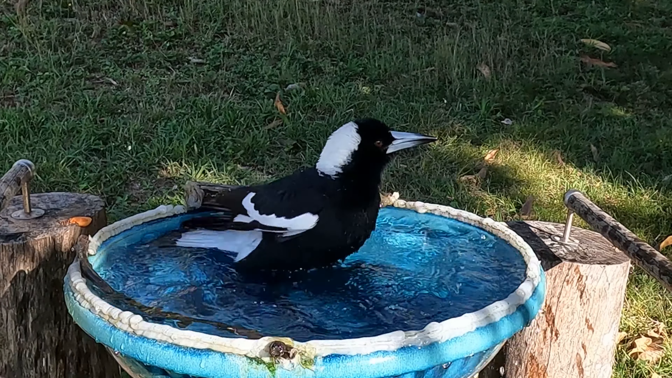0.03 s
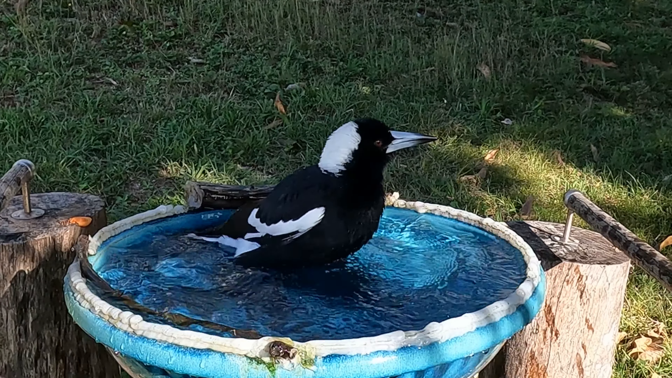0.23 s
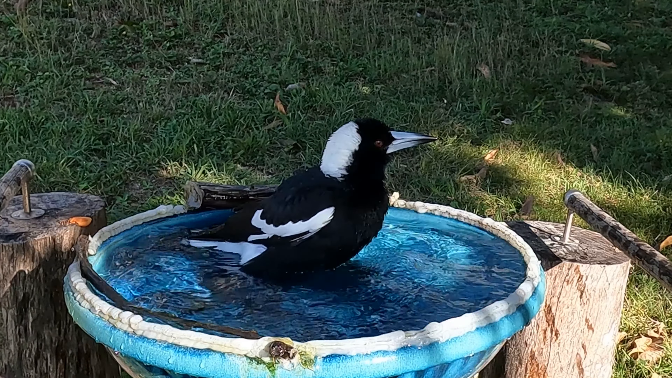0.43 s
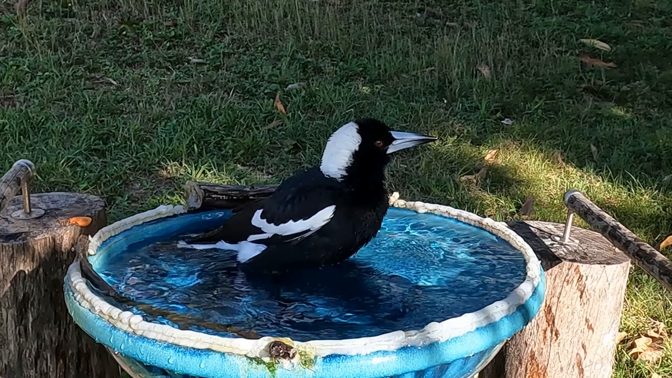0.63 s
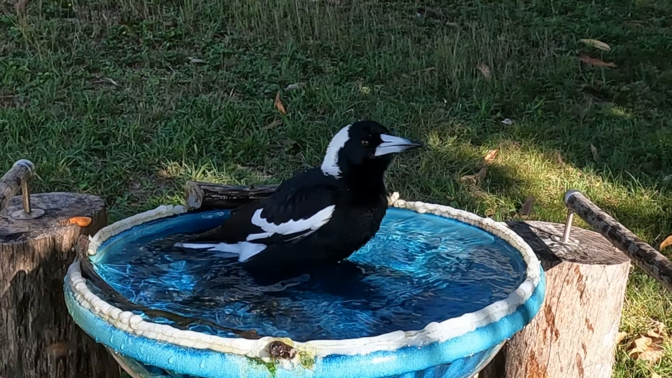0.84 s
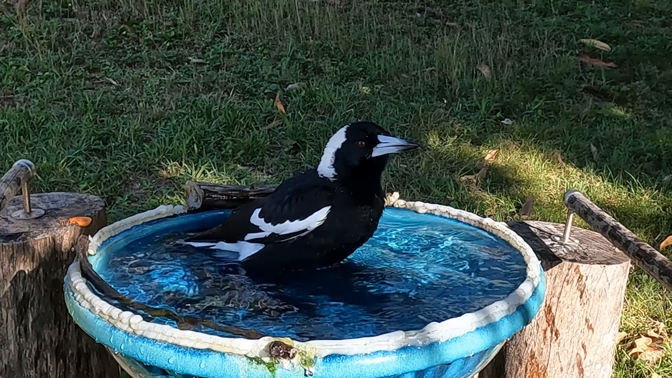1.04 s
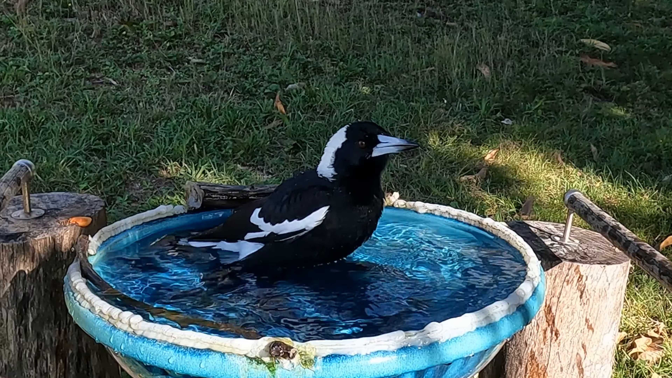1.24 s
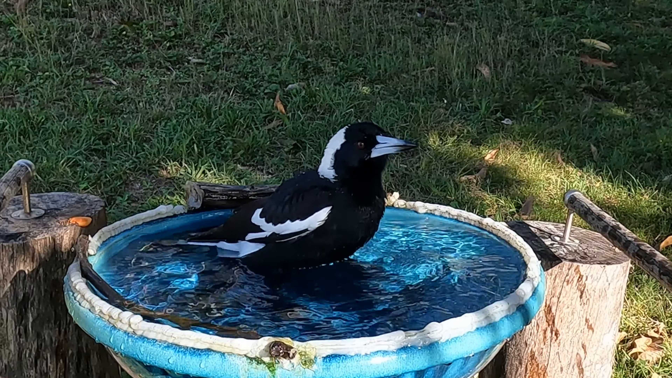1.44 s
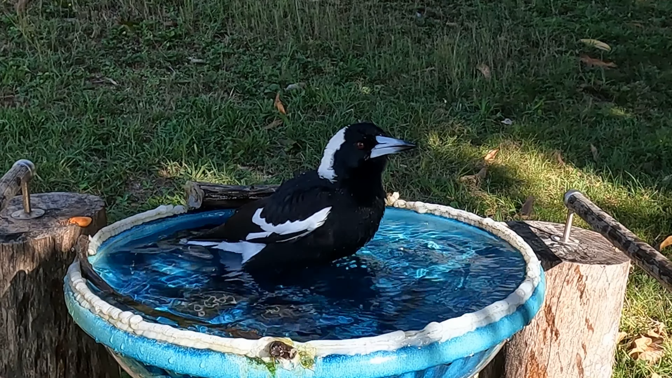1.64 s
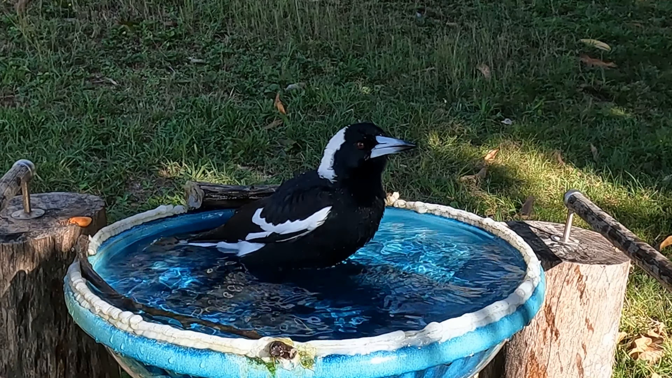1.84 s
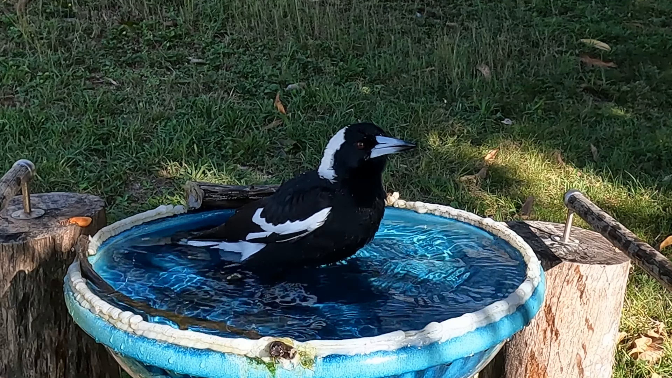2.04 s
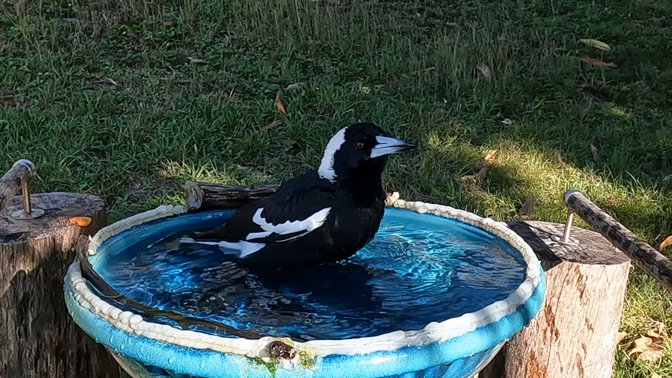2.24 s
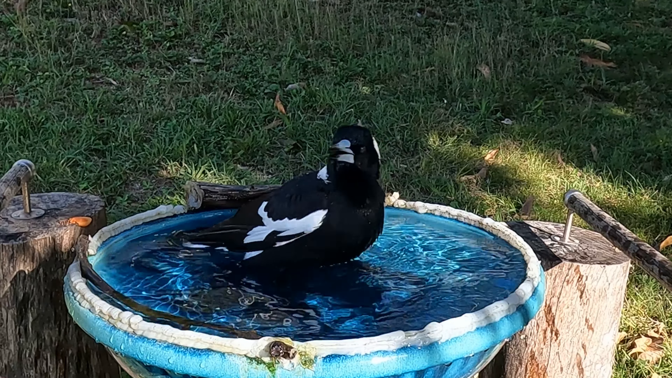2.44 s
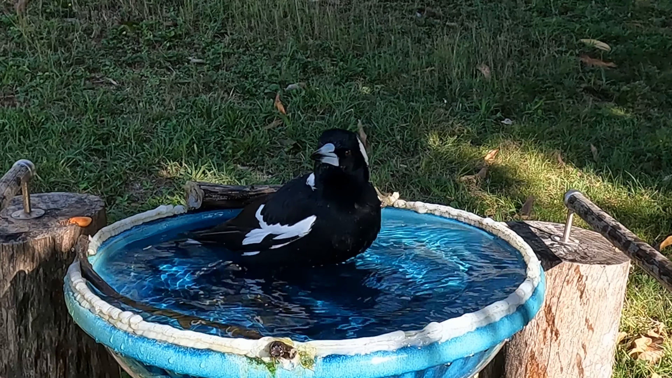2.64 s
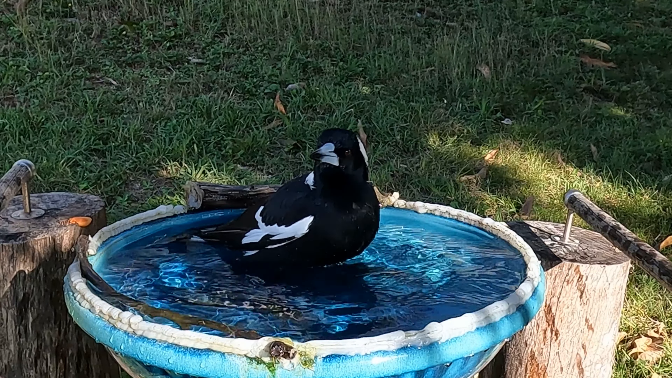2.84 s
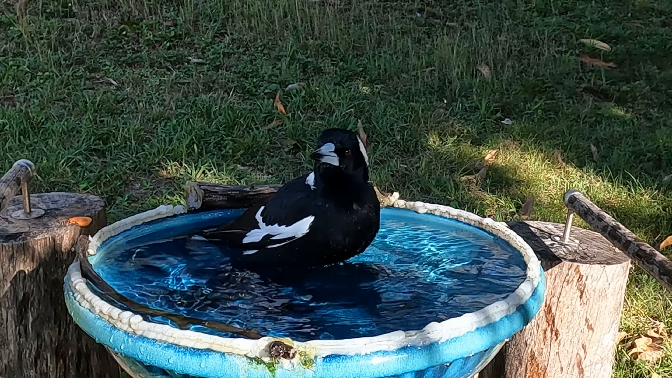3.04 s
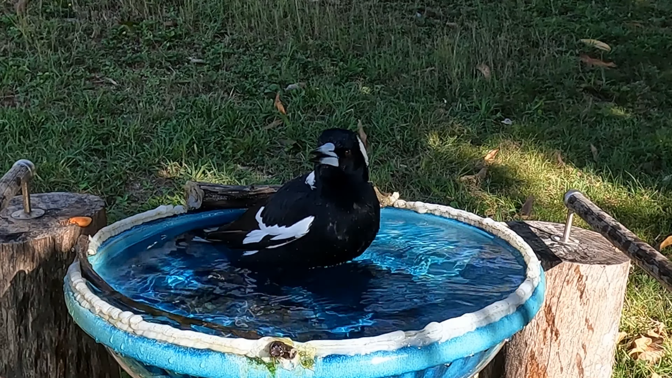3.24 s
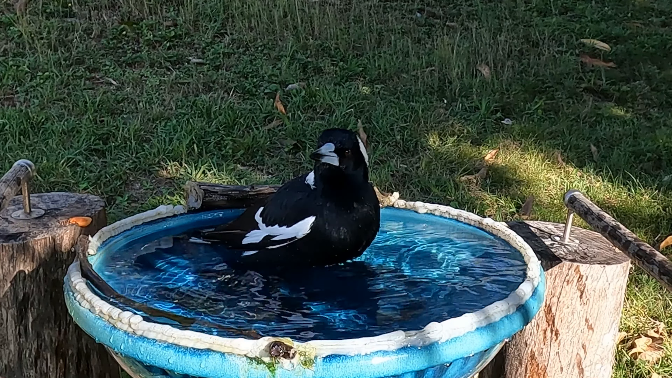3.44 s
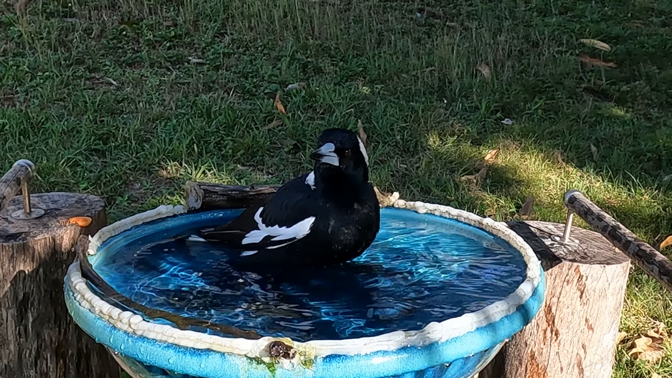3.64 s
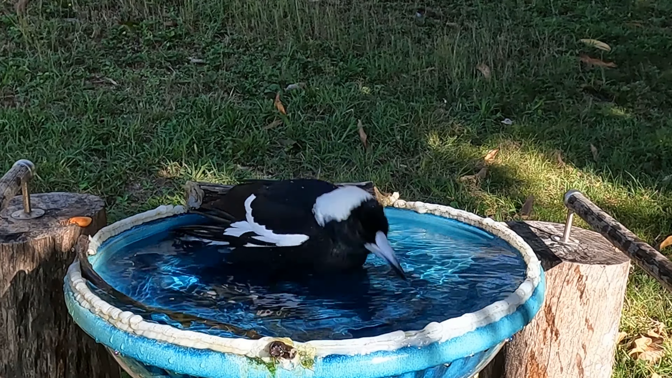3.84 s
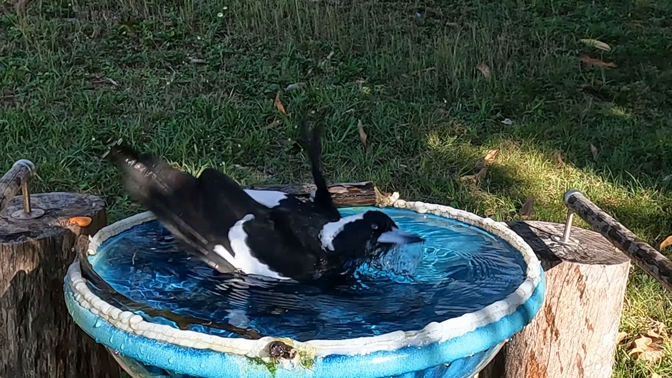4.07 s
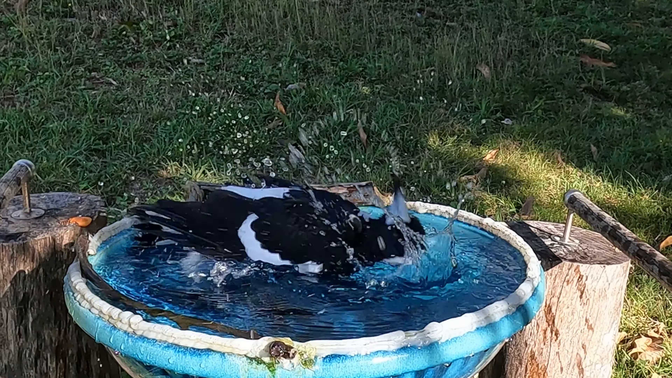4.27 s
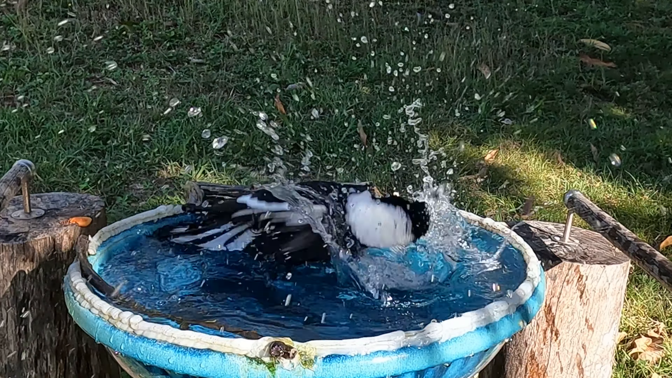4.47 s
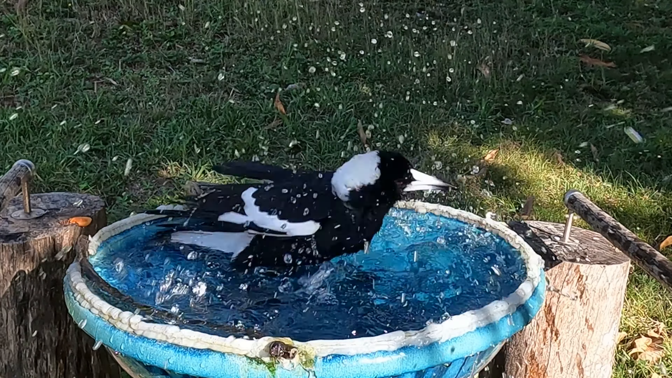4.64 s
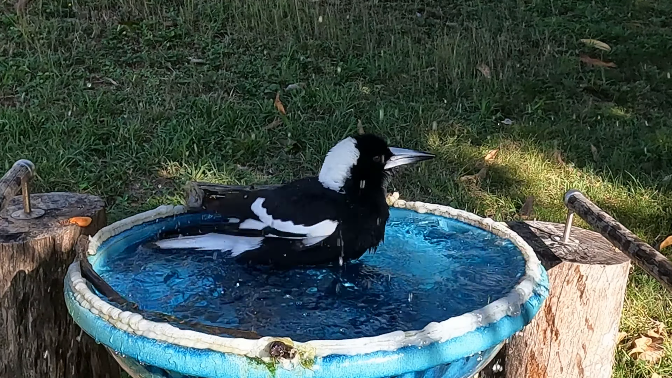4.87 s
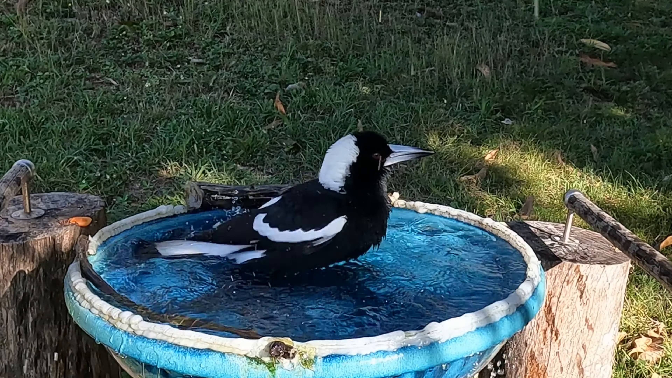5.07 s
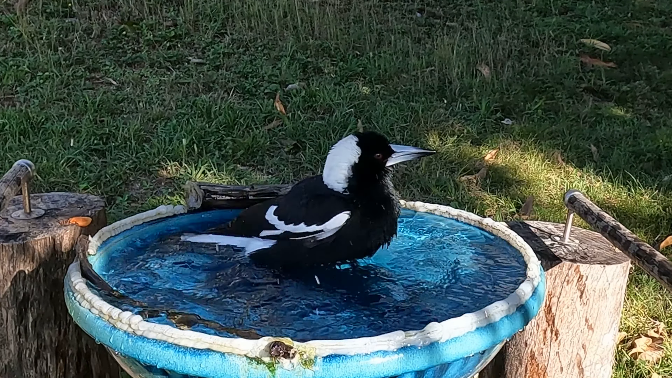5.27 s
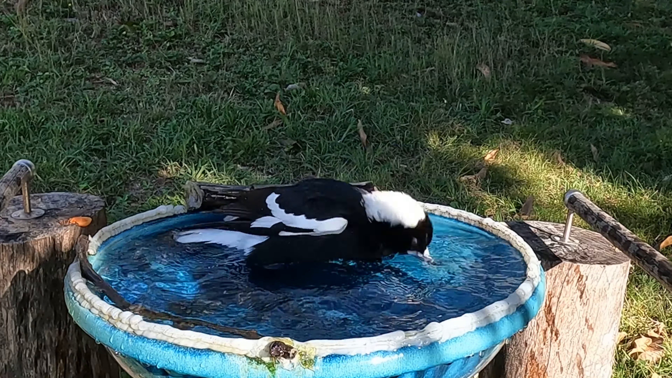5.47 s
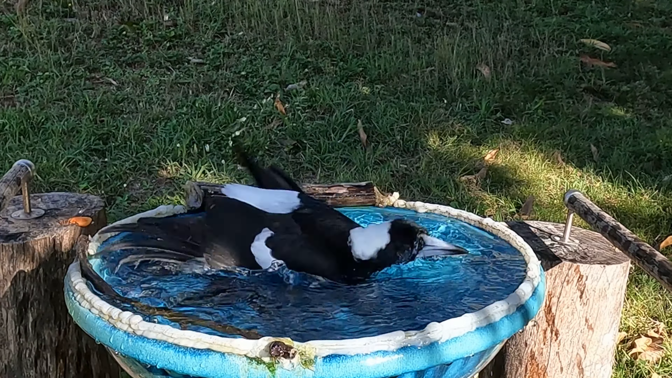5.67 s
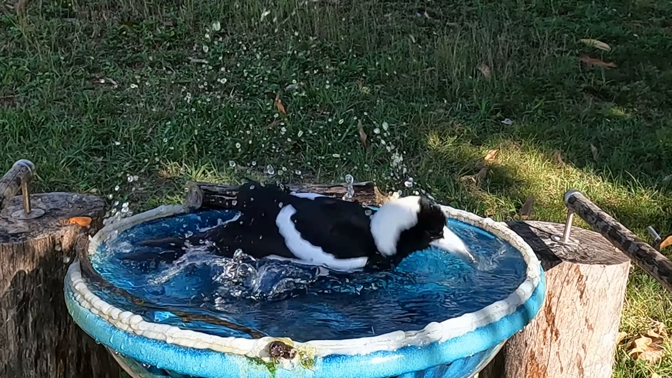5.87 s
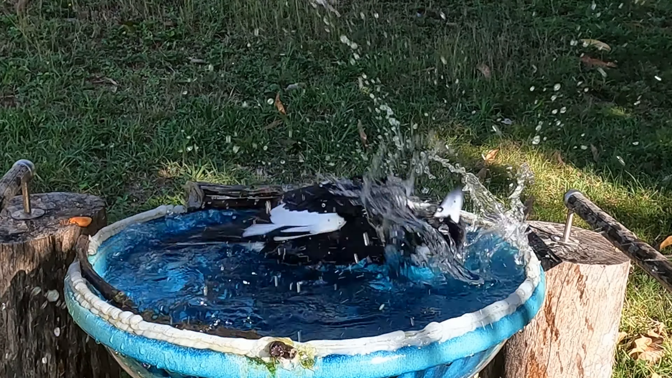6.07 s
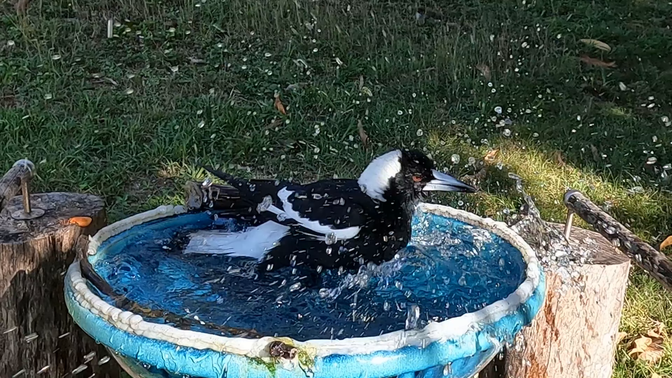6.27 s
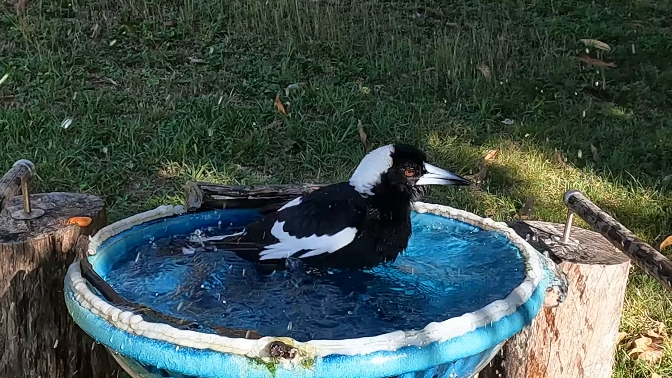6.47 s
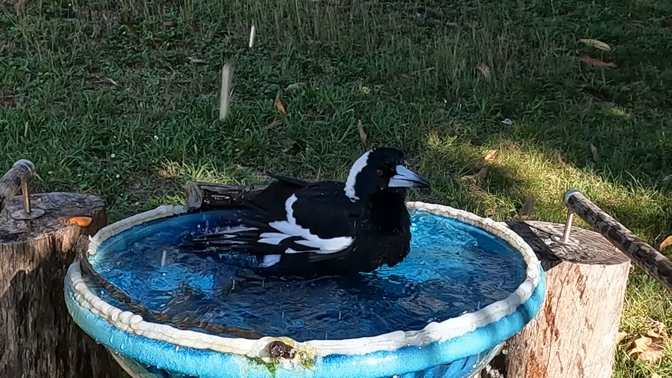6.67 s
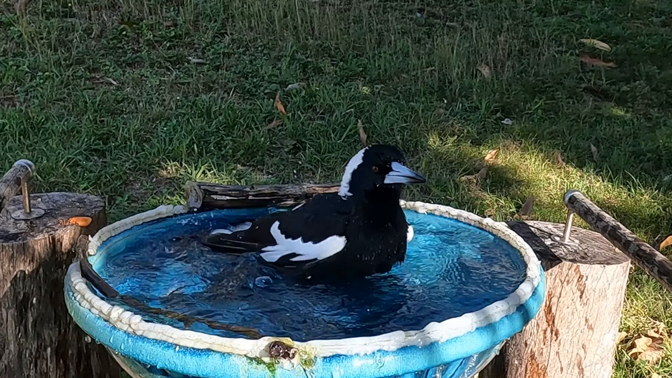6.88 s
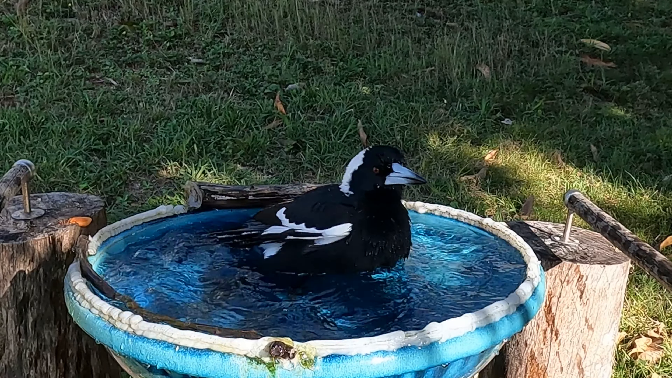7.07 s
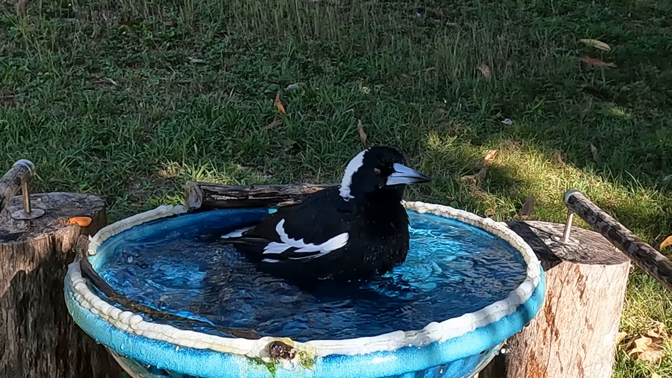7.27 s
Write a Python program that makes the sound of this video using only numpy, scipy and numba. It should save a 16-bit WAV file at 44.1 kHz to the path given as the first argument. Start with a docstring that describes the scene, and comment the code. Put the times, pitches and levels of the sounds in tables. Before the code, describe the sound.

Brief water slaps, a quiet spell of far birdsong, then two loud bouts of close splashing and bubbling as a bird bathes outdoors.

```python
"""Magpie in a garden bath

A magpie ducks and flaps in bouts in a shallow bath close to the microphone: stirred water is swarms of ringing
bubbles and spray noise, wing slaps and landing drops are noise bursts, large air pockets and the hollow ring of
the hardest slaps are gliding damped sines. Far off, among echoing fences and trees, birds whistle, coo, cheep
and trill as gliding tones with rasp and breath. A cricket throbs on a pulsed high tone, a motor hums on a
wavering low one, and shaped noise is the suburb's rumble."""
import sys
import numpy as np
from scipy import signal
from scipy.fft import rfft, irfft, next_fast_len
from scipy.io import wavfile
from scipy.ndimage import uniform_filter1d
from numba import njit

SR = 44100
rng = np.random.default_rng(int(sys.argv[2]) if len(sys.argv) > 2 else 0)


def master(y):
    """Save y as 16-bit WAV."""
    cut = np.clip(np.atleast_2d(y).T, -1, 1)
    pcm = np.round(cut * 32767)  # scale
    wavfile.write(sys.argv[1], SR, pcm.astype(np.int16))


N = 322371  # length in samples

# Far traffic, with a blur of birdsong near 2.5 kHz. Each row: frequency in Hz, relative level in dB.
SUBURB_COLOUR = [(20, -28.5), (62, -5), (125, 2), (280, -3.5), (400, -12.5), (750, -11), (1600, -19),
                 (2600, -15.5), (3150, -22), (3700, -29.5), (6800, -36), (8000, -51), (10000, -58),
                 (16000, -59)]
SUBURB_DB = -49.5  # rms before the bass swells
# Swell of the far rumble. Each row: time in seconds, gain of the bass in dB.
RUMBLE_SWELL = [(0, 1.5), (2, 0.5), (3.5, 2.5), (7.31, 2.5)]
# Distant motor. Each row: time in seconds, pitch in Hz, rms level in dB, both before the waver.
MOTOR_HUM = [(0.0, 150.2, -77), (1.12, 149.6, -61.5), (3.58, 147.9, -48.5), (6.78, 148.8, -56),
             (7.31, 149.7, -53.5)]
CRICKET_HZ, CRICKET_DB, CRICKET_FIRST_S, CRICKET_PERIOD_S = 6330, -71, .646, .1625

# Close water stirred between the wing strokes. Each row: time in seconds, level in dB.
STEADY_STIR = [(0, -48), (0.36, -52.5), (0.7, -61), (0.8, -93), (4.1, -82), (4.2, -45), (4.36, -33.5),
               (4.7, -44.5), (4.87, -54), (5.4, -52.5), (5.77, -62.5), (5.88, -38.5), (6.06, -34.5),
               (6.2, -35), (6.53, -44), (7.0, -45), (7.12, -56.5), (7.3, -54)]
# Wing strokes and showers of thrown water, each a surge of the stirring. Each row: peak time in seconds, level in dB.
STIR_SURGES = [(0.055, -37.5), (0.272, -39.5), (4.434, -34), (4.6, -32.5), (4.653, -28), (4.756, -30.5),
               (4.96, -40.5), (5.054, -36), (5.17, -41.5), (5.319, -39.5), (5.86, -35), (5.992, -29),
               (6.09, -30), (6.305, -30.5), (6.42, -38.5), (6.68, -33.5), (6.73, -38), (6.868, -35.5),
               (7.19, -51)]
SURGE_RISE_DB_S, SURGE_FALL_DB_S = 237, 207
# Wing slaps and landing drops. Each row: start in seconds, level in dB, then low body and sharp edge
# in dB against that level, the edge before a fixed trim.
SLAPS_AND_DROPS = [(0.046, -20.5, 0, -18), (0.064, -23, 2.5, -12), (0.217, -39, -17, -23),
                   (0.271, -17, -39, -16), (0.4344, -40.5, -21, -2.5), (0.491, -36.5, -13, -11),
                   (0.5454, -33.5, -14, -5.5), (0.6246, -47, -13, 6.5), (0.789, -44, 4, -12),
                   (1.35, -42.5, -11, -6), (1.6994, -47, 8, -14), (4.213, -20, -24, -28),
                   (4.235, -30.5, 2.5, -18), (4.2953, -23.5, -6, -4), (4.3475, -29, -13, -12),
                   (4.4314, -25.5, 6, 1), (4.5114, -4.5, -20, -12), (4.5732, -7.5, -11, -33),
                   (4.578, -2.5, -56, -6), (4.625, -17, -18, -12), (4.65, -5.5, -39, -2),
                   (4.712, -24, -15, -26), (4.782, -18.5, -29, -0.5), (4.798, -15.5, -30, -19),
                   (4.9062, -24.5, -10, -27), (4.945, -27, 3, -12), (4.966, -22, -5, -19),
                   (5.051, -25.5, 5.5, -27), (5.0792, -15, -2, -13), (5.155, -31.5, 13, -1),
                   (5.1613, -21.5, 6, -19), (5.1912, -5.5, -5, -32), (5.3055, -30.5, -14, 3.5),
                   (5.553, -48, 6, 6), (5.792, -19, -4.5, -9), (5.842, -33, 5, -29),
                   (5.917, -17.5, -30, -10), (5.9258, -23, -20, 0), (5.9356, -18.5, -25, -4.5),
                   (5.976, -19, -20, -24), (6.0868, -16, 0, 0.5), (6.1205, -16, -11, -26),
                   (6.1694, -9, -12, -4), (6.2114, -15, -7.5, -12), (6.2345, -15, -3, -17),
                   (6.2943, -10.5, -4, -7), (6.397, -19, -21, -25), (6.4432, -13, -41, -8),
                   (6.471, -28, -24, -14), (6.504, -24, -27, -15), (6.5362, -38, -22, 6),
                   (6.59, -19.5, -47, -40), (6.6646, -12, -7, -5), (6.67, -17.5, -12, -16),
                   (6.6954, -16.5, -11, -15), (6.725, -25.5, 4.5, -25), (6.7562, -11.5, -13, -20),
                   (6.8195, -43.5, 20, -26), (6.854, -22, -6, -13), (6.8736, -21.5, -33, 5),
                   (6.965, -43.5, 14, -10), (7.177, -49, -13, 6)]
SPLAT_T60_S, SLOSH_S_PER_DB = .0095, .0007  # base decay; a full body sloshes on longer
# Large air pockets that ring out clearly, and the hollow ring and body of the hardest slaps. Each row: start in
# # seconds, pitch in Hz, rise in octaves a second, peak in dB before the shaking, cycles at the starting pitch
# to # fall 60 dB.
RINGS = [(4.236, 4370, -4, -22.5, 46), (4.304, 2180, 3, -17.5, 35), (4.321, 2300, -6, -19, 30),
         (4.365, 3500, -8, -29, 40), (4.386, 3220, -3, -20.5, 38), (4.397, 800, 18, -22, 23),
         (4.404, 4960, 5, -32, 48), (4.414, 1330, 18, -36, 60), (4.419, 2650, -9, -21, 52),
         (4.438, 1740, 8, -25, 57), (4.466, 2020, 0, -24.5, 74), (4.47, 1050, 0, -30.5, 80),
         (4.469, 2920, -8, -23.5, 61), (4.496, 2130, 9, -23.5, 63), (4.5098, 3620, -2, -1, 20),
         (4.5105, 2160, 5, -1, 15), (4.572, 962, 8, -2.5, 10.8), (4.531, 830, 5, -24.5, 52),
         (4.53, 4100, 5, -25, 43), (4.576, 3580, -2, -27, 60), (4.585, 2680, 9, -14, 33),
         (4.603, 2330, 9, -20, 57), (4.622, 1206, 19, -15.5, 38), (4.653, 2190, 16, -14, 37),
         (4.665, 1630, 20, -17, 48), (4.711, 2960, 1, -27, 71), (4.715, 1570, -2, -22, 31),
         (4.753, 3645, 5, -25, 54), (4.768, 2280, 0, -23, 40), (4.785, 3020, 2, -20.5, 65),
         (4.81, 1292, 11.5, -28, 110), (4.828, 1490, 63, -30, 140), (5.944, 3300, 0, -18.5, 35),
         (5.975, 2480, 8, -19.5, 42), (5.989, 1560, 3, -15.5, 41), (5.99, 2490, -5, -2, 18.7),
         (6.019, 972, 4, -25, 105), (6.049, 1183, -1, -18.5, 96), (6.051, 2300, 0, -12.5, 61),
         (6.058, 1734, 2.5, -16, 130), (6.085, 2740, 1, -21.5, 83), (6.091, 1410, 10.5, -21, 170),
         (6.147, 3200, 2, -25, 40), (6.168, 3180, 0, -7, 25), (6.1683, 5190, 0, -7, 32),
         (6.184, 1680, 12.5, -30, 120), (6.25, 737, 7, -25.5, 44), (6.217, 1810, 2, -25, 110),
         (6.293, 835, 4, -22, 22), (6.305, 1870, 0, -24, 52), (6.366, 2550, 5, -24, 53),
         (6.393, 1196, -4, -26, 105), (6.409, 2716, 11, -16.5, 65), (6.407, 1610, 4, -17, 64),
         (6.434, 2940, 10, -28, 100), (6.444, 1970, 30, -16.5, 60), (6.468, 2800, -3, -21, 58),
         (6.472, 1850, 23, -26, 98), (6.502, 1960, 28, -23, 105), (6.505, 1753, 1, -14.5, 55),
         (6.544, 997, 3, -37.5, 120)]
# Each ring breaks into fragments: scatter in pitch and time, level against the ring, share of its ring time.
FRAGMENT_OCTAVES, FRAGMENT_S, FRAGMENT_DB, FRAGMENT_RING = .2, .01, -13, .45
# Colour of the water at the microphone. Each row: frequency in Hz, gain in dB.
WATER_COLOUR = [(230, -38), (350, -1.5), (700, -6.5), (1500, -4), (5000, 4), (7000, 0), (8200, -10),
                (9000, -19.5), (10000, -7), (13000, -8.5), (15500, -18)]

# One bird's rising whistles. Each row: start in seconds, length in seconds, from Hz, to Hz, level in dB.
WHISTLE_NOTES = [(0.155, 0.054, 1880, 2050, -58), (0.212, 0.066, 2047, 2383, -44),
                 (0.305, 0.065, 2060, 2190, -53), (0.371, 0.044, 2240, 2520, -51),
                 (0.686, 0.075, 1964, 2420, -54.5), (0.796, 0.058, 1980, 2250, -52.5),
                 (1.27, 0.075, 1860, 2110, -58), (1.345, 0.072, 2096, 2600, -43.5),
                 (1.453, 0.078, 2096, 2514, -45), (2.042, 0.078, 1965, 2450, -43.5),
                 (2.11, 0.046, 2217, 2570, -45), (2.175, 0.07, 2140, 2540, -50),
                 (2.551, .085, 1915, 2210, -57), (2.762, 0.075, 1880, 2070, -52),
                 (2.818, 0.085, 1974, 2443, -42), (3.612, 0.077, 2080, 2050, -50.5),
                 (3.66, 0.065, 2050, 2250, -44), (3.708, 0.063, 2185, 2410, -46),
                 (4.949, 0.12, 2060, 2510, -48), (5.577, 0.065, 1953, 2320, -52),
                 (5.74, 0.1, 1964, 2410, -44.5), (6.522, 0.11, 1963, 2375, -46)]
WHISTLE_HOARSE = .35  # radians of phase rasp
# Low sagging coos. Each row: start in seconds, length in seconds, level in dB.
COO_NOTES = [(0.33, 0.17, -57), (5.607, 0.099, -52)]
COO_HZ, COO_SAG_HZ_S = 1524, 355  # starting pitch, average fall
# Another bird's quick hoarse cheeps, further off. Each row: start in seconds, from Hz, to Hz, level in dB.
CHEEP_NOTES = [(1.375, 2900, 3300, -54), (1.475, 2750, 3230, -53), (2.08, 2730, 3010, -49.5),
               (2.62, 4110, 6300, -62), (2.652, 3260, 4300, -57), (3.001, 5200, 7040, -54),
               (3.543, 3030, 4260, -50.5), (3.692, 2900, 4200, -48), (3.836, 2925, 4300, -49),
               (3.985, 2930, 4890, -48.5), (4.139, 2920, 4060, -48)]
CHEEP_S, CHEEP_HOARSE = .05, 1.1  # length, radians of phase rasp
# A further bird's falling phrases. Each row: start in seconds, length in seconds, from Hz, to Hz, level in dB.
TRILL_PHRASES = [(1.567, 0.68, 2927, 2560, -55), (2.564, .85, 2870, 2520, -52.5)]
# Level of the scattered difference between left and right. Each row: frequency in Hz, side against middle in dB.
SIDE_COLOUR = [(60, -65), (400, -36), (1500, -59), (4000, -55), (7000, -24), (9000, -12)]
TOP_HZ = 15900  # top of the recorder's range


def undb(db):
    """Gain of a dB value."""
    return 10 ** (np.asarray(db) / 20)


def colour(x, points):
    """Shape a sound by (Hz, dB) points, joined in straight lines over log frequency."""
    hz, db = np.transpose(points)
    size = next_fast_len(x.shape[-1])
    f = np.maximum(np.fft.rfftfreq(size, 1 / SR), 1)
    gain = undb(np.interp(np.log(f), np.log(hz), db))
    return irfft(rfft(x, size) * gain, size)[..., :x.shape[-1]]


def band(x, lo_hz, hi_hz):
    """Band-pass scaled to rms 1."""
    sos = signal.butter(2, [lo_hz, hi_hz], "bandpass", fs=SR, output="sos")
    y = signal.sosfilt(sos, x)
    return y / np.std(y)


def walk(rate):
    """Random levels held 1 / rate seconds and smoothed twice over that time."""
    k = int(SR / rate)
    steps = np.repeat(rng.standard_normal(N // k + 1), k)
    return uniform_filter1d(uniform_filter1d(steps, k), k)[:N]


def echoes(x, t60, wet_db, dull_db=0):
    """Direct sound plus a scattered tail from fences and foliage, which may swallow its treble."""
    t = np.arange(int(t60 * SR)) / SR
    tail = rng.standard_normal(len(t)) * 1000 ** (-t / t60)
    tail = colour(tail / np.linalg.norm(tail), [(3500, 0), (6000, dull_db)])
    return x + undb(wet_db) * signal.fftconvolve(x, tail)[:N]


def suburb():
    """Far traffic and leaves: smooth noise whose bass swells."""
    bed = colour(rng.standard_normal(N), SUBURB_COLOUR)
    rumble = colour(bed, [(300, 0), (500, -40)])
    swell = undb(np.interp(np.arange(N) / SR, *np.transpose(RUMBLE_SWELL)))
    return undb(SUBURB_DB) * (bed + (swell - 1) * rumble) / np.std(bed)


def motor():
    """One slightly wavering low tone that swells and fades."""
    s, hz, db = np.transpose(MOTOR_HUM)
    t = np.arange(N) / SR
    pitch = np.interp(t, s, hz) + 1.47 * walk(11)
    level = np.interp(t, s, db) + 2.24 * walk(9)
    phase = 2 * np.pi * np.cumsum(pitch) / SR
    return np.sqrt(2) * undb(level) * np.sin(phase)


def cricket():
    """Chirps of three wing strokes, about six a second, each stroke a swell of one high tone."""
    t = np.arange(N) / SR
    since = (t - CRICKET_FIRST_S) % CRICKET_PERIOD_S
    strokes = (since < 3 * .026) * np.sin(np.pi * since / .026) ** 2  # 26 ms a stroke
    uneven = undb(3 * walk(20))
    tone = np.sin(2 * np.pi * CRICKET_HZ * t + 1.2 * walk(300))
    return undb(CRICKET_DB) * uneven * strokes * tone


def stirring():
    """Steady stirring plus a quick rise and fall at each surge, added as power."""
    t = np.arange(N) / SR
    power = undb(np.interp(t, *np.transpose(STEADY_STIR))) ** 2
    for s, db in STIR_SURGES:
        drop = np.maximum(SURGE_RISE_DB_S * (s - t), SURGE_FALL_DB_S * (t - s))
        power = power + undb(db - drop) ** 2
    return np.sqrt(power)


@njit
def ring(out, s, hz, rise, size, t60, swell_s):
    """Bubbles as damped sines that swell briefly and glide; rising nears the surface, an octave up it bursts."""
    for k in range(len(s)):
        start, phase = int(s[k] * SR), 0.
        for i in range(min(int(t60[k] * SR), len(out) - start)):
            t = i / SR
            climb = rise[k] * t  # octaves
            phase += 2 * np.pi * min(hz[k] * 2 ** climb, SR / 3) / SR
            whole = min(1., max(0., 5 * (1.2 - climb)))  # fades from 1 to 1.2 octaves
            envelope = (1 - np.exp(-t / swell_s)) * 1000 ** (-t / t60[k])
            out[start + i] += size[k] * whole * envelope * np.sin(phase)
    return out


def grains(count, lo_hz, hi_hz, cycles, spread_db, rise, swell_s):
    """A random swarm of bubbles of many sizes, few of them loud; rms 1."""
    when, pitch, vigour, rarity = rng.random((count, 4)).T
    hz = lo_hz * (hi_hz / lo_hz) ** pitch
    t60 = cycles * (.5 + vigour) / hz
    size = undb(-spread_db * np.log(rarity + .015))
    y = ring(np.zeros(N), when * N / SR, hz, rise * vigour / t60, size, t60, swell_s)
    return y / np.std(y)


def churn():
    """Stirred water: deep glugs, a dense gurgle of short bubbles, crackle of bursting films and a hiss of spray."""
    stir = stirring()
    glugs = grains(count=900, lo_hz=550, hi_hz=1500, cycles=20, spread_db=3, rise=.5, swell_s=.0005)
    gurgle = grains(count=5000, lo_hz=1100, hi_hz=5000, cycles=30, spread_db=4.5, rise=.7, swell_s=.0003)
    crackle = grains(count=7000, lo_hz=1740, hi_hz=12500, cycles=4.8, spread_db=0.5, rise=0.36,
                     swell_s=0.000086)
    hiss = band(rng.standard_normal(N), 1400, 9600)
    spray = undb(4 * walk(70)) * (undb(-8) * crackle + undb(-15) * hiss)
    # hard stirring traps more air, so the bubbles grow faster than the spray
    air = (stir / stir.max()) ** .2
    pulsing_gurgle = undb(-2.5) * undb(1.66 * walk(60)) * gurgle
    return stir * (air * (pulsing_gurgle + undb(-11.5) * glugs) + spray)


def splats():
    """Quick noise bursts: the middle smack lingers longest, then the low body; edge and fizz die sooner."""
    out = np.zeros(N + SR)
    t = np.arange(SR // 8) / SR
    for s, peak_db, body_db, edge_db in SLAPS_AND_DROPS:
        noise = rng.standard_normal((4, len(t)))
        t60 = SPLAT_T60_S + SLOSH_S_PER_DB * max(body_db + 8, 0)
        attack = 1 - np.exp(-(t / (0.055 * t60)) ** 2)
        # smack, body, edge, fizz: dB against the slap's level, from Hz, to Hz, share of the decay time
        layers = [(-5.5, 1812, 4137, 2.0), (body_db, 330, 1600, 1.4),
                  (edge_db + 1.5, 4600, 8500, .8), (edge_db - 27.0, 9000, 15000, .7)]
        i = int((s - .0006) * SR)
        for hiss, (db, lo_hz, hi_hz, linger) in zip(noise, layers):
            crack = np.exp(-(t / (.15 * linger * t60)) ** 3)
            wash = .2 * 1000 ** (-t / (2 * linger * t60))
            burst = attack * band(hiss, lo_hz, hi_hz) * (crack + wash)
            out[i:i + len(t)] += undb(peak_db + db) * burst / np.abs(burst).max()
    return out[:N]


def note(length, from_hz, to_hz, bend, lean=1.0):
    """Phase and envelope of a gliding whistle; lean moves its strongest moment from the middle."""
    u = np.arange(int(length * SR)) / (length * SR)
    pitch = from_hz + (to_hz - from_hz) * u ** bend
    return 2 * np.pi * np.cumsum(pitch) / SR, np.sin(np.pi * u ** lean)


def birds(notes):
    """Hoarse whistled glides whose overtones and breath come out with effort."""
    out = np.zeros(N)
    breath = band(rng.standard_normal(N), 2900, 6000)
    rasp = walk(700)
    for s, length, from_hz, to_hz, db, hoarse, bend, lean in notes:
        phase, shape = note(length, from_hz, to_hz, bend, lean)
        span = slice(int(s * SR), int(s * SR) + len(phase))
        whistle = np.sin(phase + hoarse * rasp[span])
        extra = np.sin(2 * phase) + .7 * np.sin(3 * phase) + .7 * breath[span]
        effort = undb(-24 + .7 * (db + 50))
        out[span] += undb(db) * shape ** .7 * (whistle + effort * extra)
    return out * (1 + .3 * walk(250))


def whistles_and_coos():
    """The nearer birds: whistles glide, mostly up; coos sag in pitch with little rasp."""
    whistles = [row + (WHISTLE_HOARSE, 1.1, 1.3) for row in WHISTLE_NOTES]
    coos = [(s, length, COO_HZ, COO_HZ - COO_SAG_HZ_S * length, db, .1, 1.4, 1.1)
            for s, length, db in COO_NOTES]
    return birds(whistles + coos)


def cheeps():
    """A further bird's short steep upward glides, made hoarse by strong phase rasp."""
    return birds([(s, CHEEP_S, from_hz, to_hz, db, CHEEP_HOARSE, 1.6, .8)
                  for s, from_hz, to_hz, db in CHEEP_NOTES])


def trills():
    """Rough phrases that fall in pitch, pulsed in level and pitch 19 times a second."""
    out = np.zeros(N)
    for s, length, from_hz, to_hz, db in TRILL_PHRASES:
        phase, shape = note(length, from_hz, to_hz, bend=2.4)
        stroke = 2 * np.pi * 19 * np.arange(len(phase)) / SR
        beats = .55 - .45 * np.cos(stroke)
        rough = .6 * walk(600)[:len(phase)]
        tone = np.sin(phase + 4.0 * np.sin(stroke) + rough)
        out[int(s * SR):][:len(phase)] += undb(db) * shape * beats * tone
    return out


def bubbles(count=5):
    """The large air pockets and slap rings, one by one, shaken by the water and trailed by short-lived
    fragments."""
    s, hz, rise, db, cycles = np.transpose(RINGS) * 1.
    t60 = np.maximum(cycles / hz, .005)
    pockets = ring(np.zeros(N), s + 0.001006, hz, rise, undb(db), t60, 0.0004)
    out = pockets * (1 + .35 * walk(500))
    for late, detune, uneven in rng.standard_normal((len(s), count, 3)).transpose(1, 2, 0):
        fragment_s = s + np.minimum(FRAGMENT_S, t60 / 2) * np.abs(late)
        fragment_hz = hz * 2 ** (FRAGMENT_OCTAVES * detune)
        size = undb(db + FRAGMENT_DB + 3 * uneven)
        out = ring(out, fragment_s, fragment_hz, rise, size, FRAGMENT_RING * t60, 0.0003)
    return out


def scene():
    """Everything arrives from one spot; the two sides differ by a faint blurred copy of it, mostly treble."""
    water = colour(echoes(churn() + splats() + bubbles(), t60=.15, wet_db=-20), WATER_COLOUR)
    near = echoes(whistles_and_coos(), t60=.7, wet_db=0.1, dull_db=-4)
    far = echoes(cheeps() + trills(), t60=.85, wet_db=1.5, dull_db=-2.5)
    song = colour(near + far, [(7000, 0), (9000, -18)])  # the far air takes the top
    mid = water + song + echoes(cricket(), t60=0.18, wet_db=-5.0) + motor() + suburb()
    scatter = rng.standard_normal(256)
    scattered = np.convolve(mid, scatter / np.linalg.norm(scatter))[:N]
    side = colour(scattered, SIDE_COLOUR)
    return np.array([mid + side, mid - side])


def record(dry):
    """The recorder rounds mainly the loudest peaks and cuts the top."""
    rounded = dry / (1 + (dry / 1.1) ** 4) ** .25
    return signal.sosfilt(signal.ellip(8, .2, 70, TOP_HZ, fs=SR, output="sos"), rounded)


dry = scene()
out = record(dry)
master(out)
```